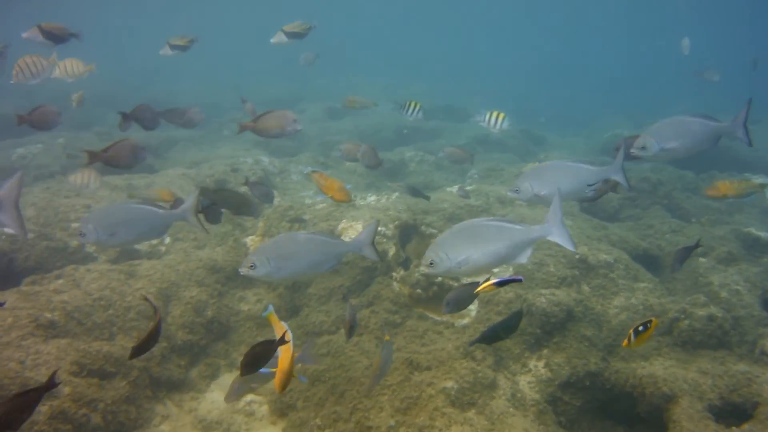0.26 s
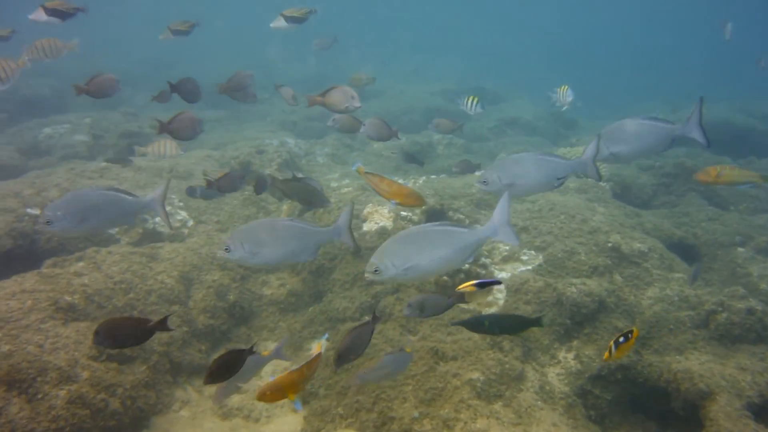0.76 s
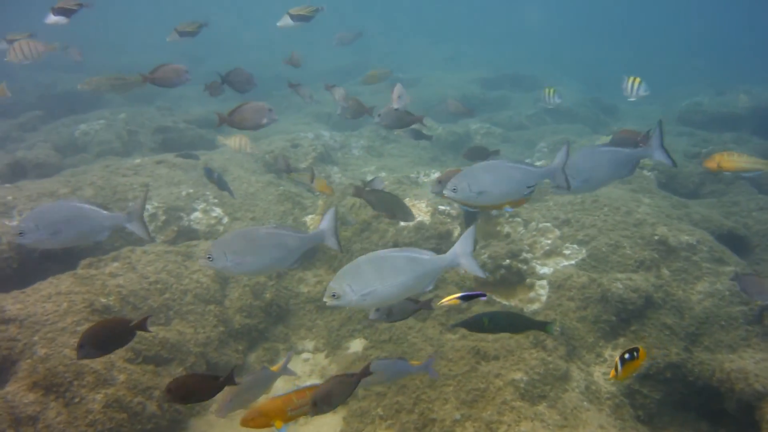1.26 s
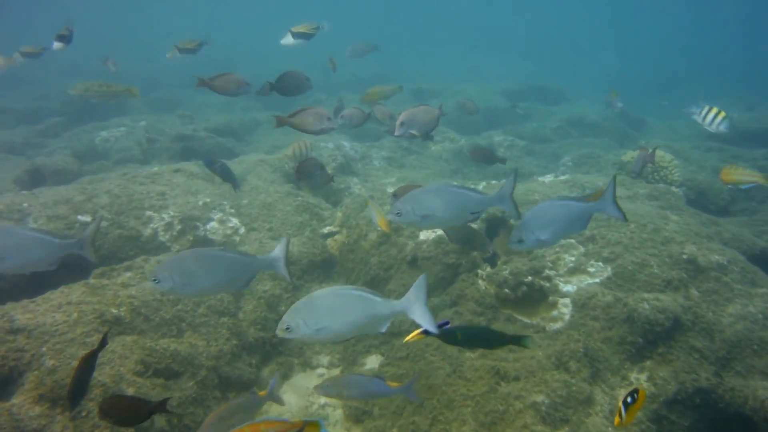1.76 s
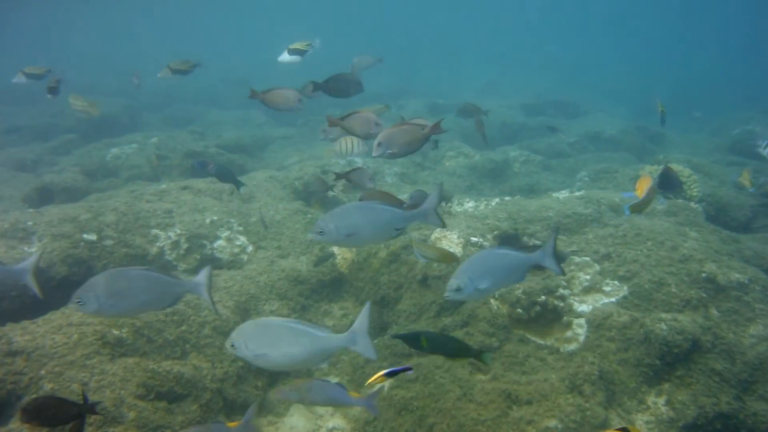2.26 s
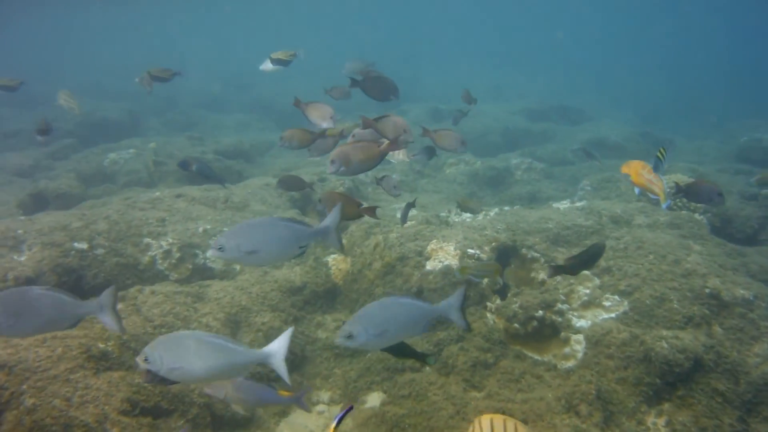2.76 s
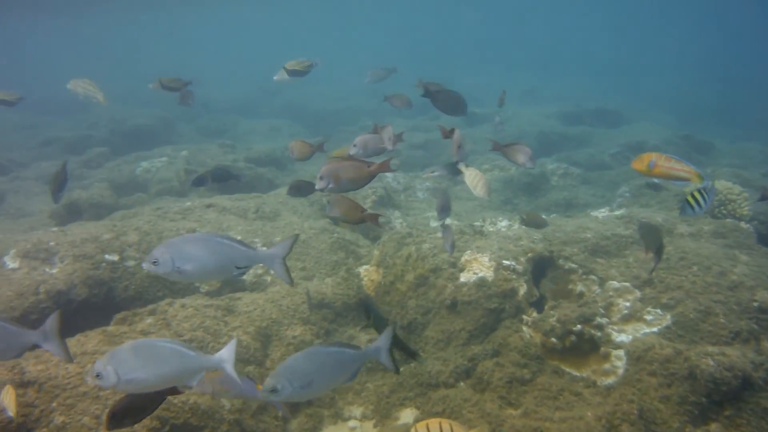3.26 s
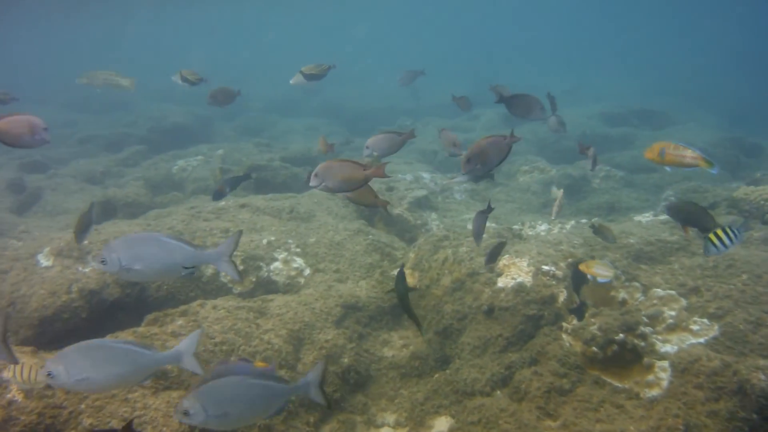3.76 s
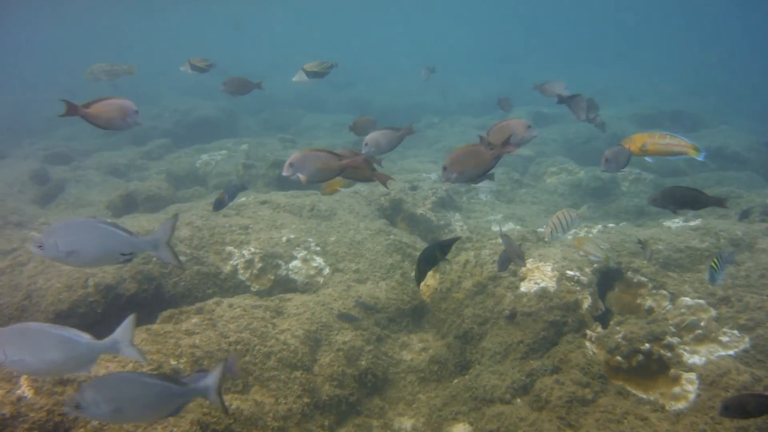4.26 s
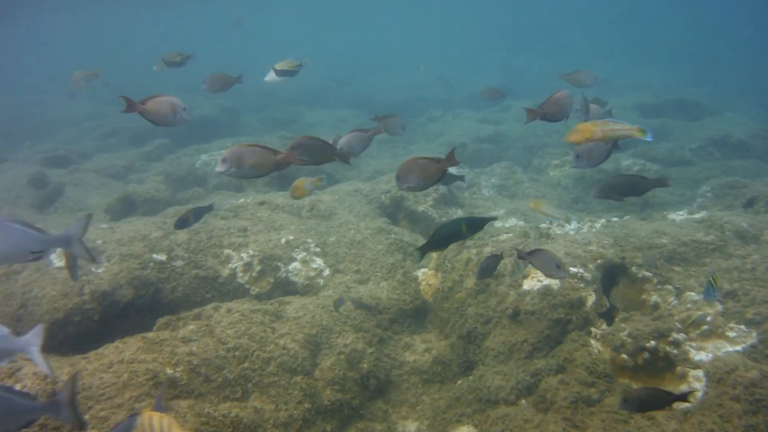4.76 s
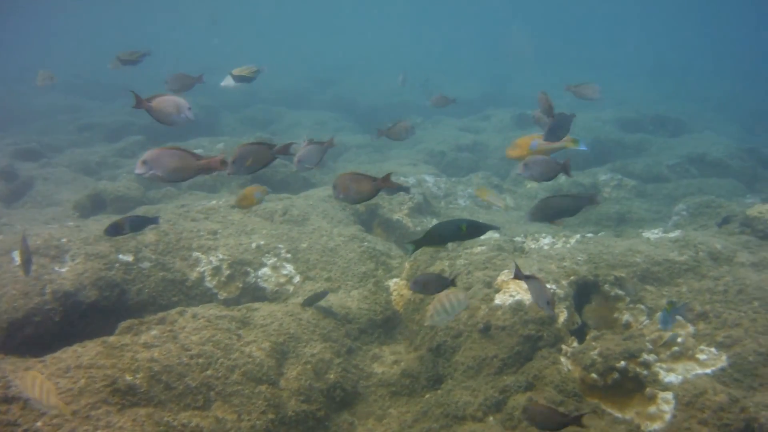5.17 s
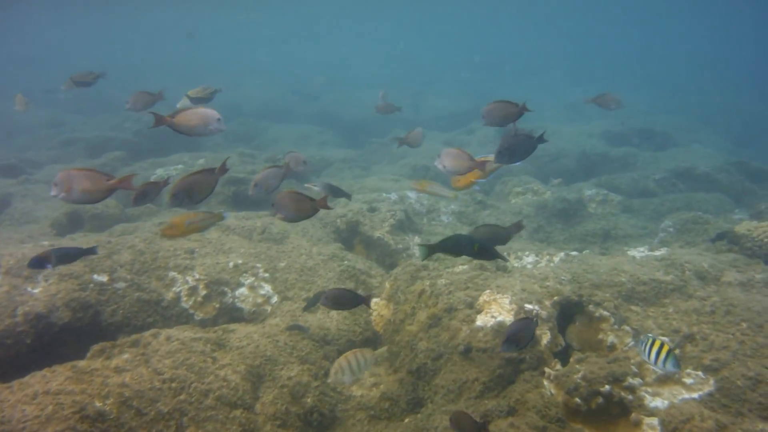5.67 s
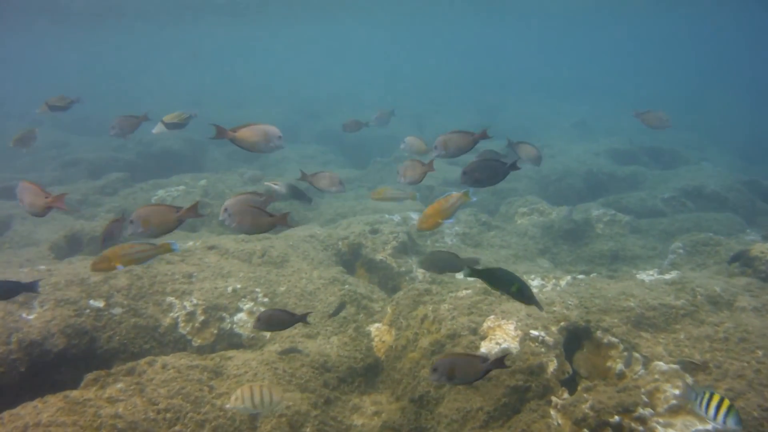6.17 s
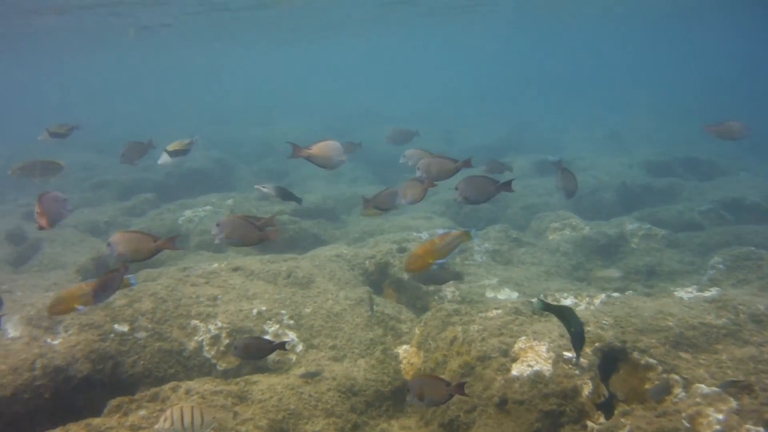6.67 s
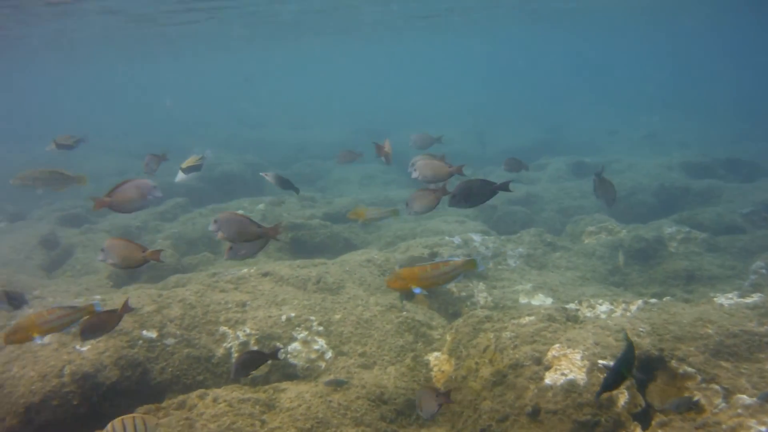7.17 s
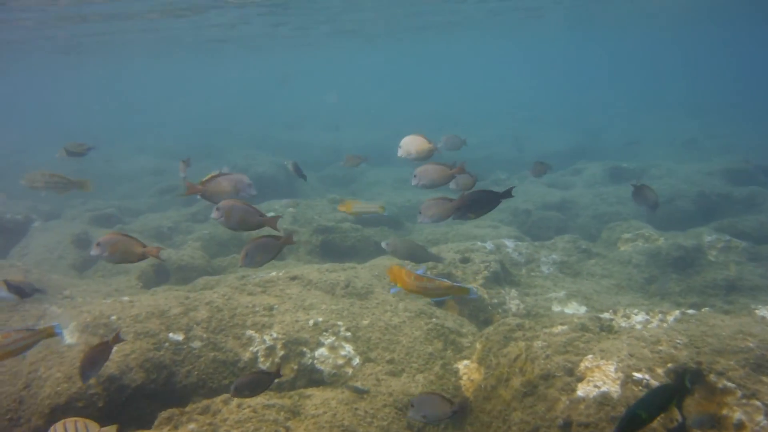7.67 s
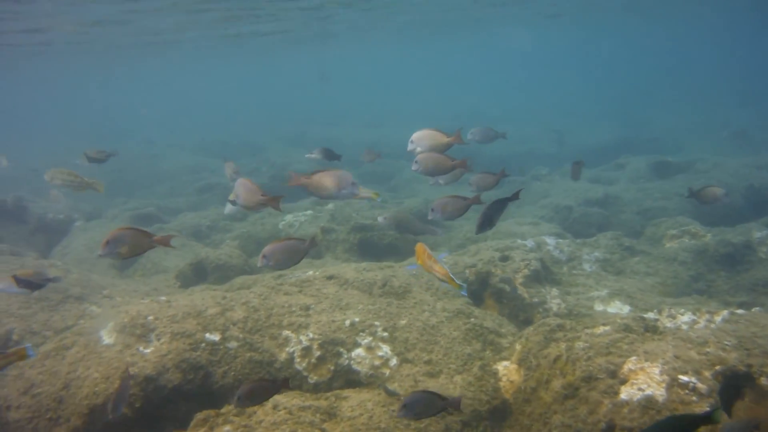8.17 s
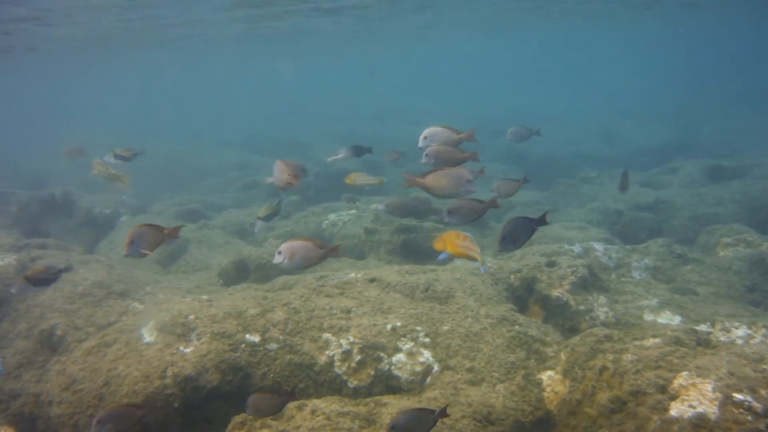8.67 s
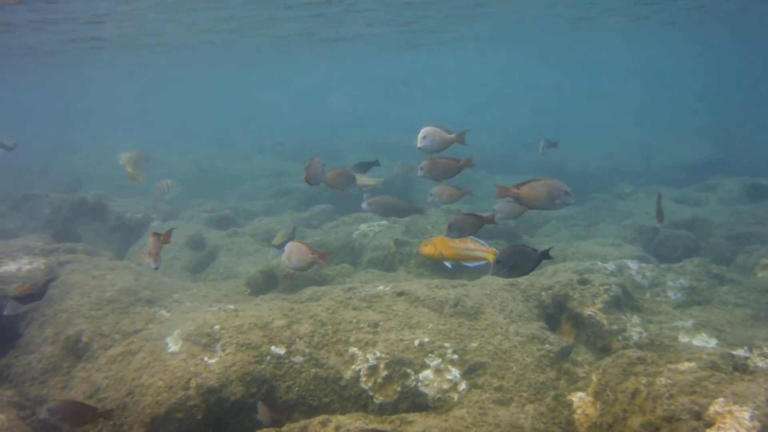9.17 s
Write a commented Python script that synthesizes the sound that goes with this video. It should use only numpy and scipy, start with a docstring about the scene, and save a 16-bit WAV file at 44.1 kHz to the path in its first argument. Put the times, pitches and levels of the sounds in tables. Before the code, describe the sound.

Hollow, muffled underwater rush surges over a reef, with constant shrimp crackle, sharp close snaps and boomy knocks on a camera housing.

```python
"""Faint, hollow rushing water and a fine crackle open the scene, inside a watertight camera housing over a reef.
The rush is turbulence coloured by the housing's air cavity; its level surges and slackens.
Knocks and eddies thud on the case: each is a pressure pulse, a dying cavity ring and a burst of crunch.
Shrimp snaps are short cracks plus wall rings, scattered over the reef or placed close by.
Gritty bursts of grains, lumps of churning water and one low hum pass over a steady murmur, hiss and thin whine."""
import sys
import numpy as np
from scipy import signal
from scipy.fft import rfft, irfft
from scipy.io import wavfile
from scipy.ndimage import uniform_filter1d

SR = 44100
rng = np.random.default_rng(int(sys.argv[2]) if len(sys.argv) > 2 else 0)


def file_out(sig):
    """Save sig as 16-bit WAV at sys.argv[1]."""
    # one column per channel
    cols = np.atleast_2d(sig).T
    # limit, then scale
    lim = np.clip(cols, -1, 1)
    pcm = np.round(lim * 32767).astype(np.int16)
    wavfile.write(sys.argv[1], SR, pcm)


N = 414981
TIME = np.arange(N) / SR


def from_db(db):
    """Decibels to gain."""
    return 10 ** (np.asarray(db) / 20)


def rms_one(x):
    """Scale to rms 1."""
    return x / np.sqrt(np.mean(x ** 2) + 1e-20)


def peak_one(x):
    """Scale to peak 1."""
    return x / (np.abs(x).max() + 1e-20)


def in_time(rows):
    """Draw a curve through (t/s, value) rows at every sample."""
    return np.interp(TIME, *np.transpose(rows))


def swell(at_s, length_s):
    """A smooth rise and fall of height 1 around a moment."""
    return np.exp(-2 * np.minimum(((TIME - at_s) / length_s) ** 2, 20))


def add(out, s, sound):
    """Mix a sound in at a time in seconds."""
    at = max(int(round(s * SR)), 0)
    out[at:at + len(sound)] += sound[:max(N - at, 0)]


def response(colour, size=4096):
    """Minimum-phase impulse response of a body with this colour, falling 10 dB per octave beyond its ends."""
    hz, db = np.transpose(colour)
    octave = np.log2(np.maximum(np.fft.rfftfreq(size, 1 / SR), 1))
    known = np.log2(hz)
    beyond = np.abs(octave - np.clip(octave, known[0], known[-1]))
    level_db = np.interp(octave, known, db) - 10 * beyond
    # folding the cepstrum forward makes the response causal
    cepstrum = irfft(np.log(from_db(level_db)))
    cepstrum[1:size // 2] *= 2
    cepstrum[size // 2 + 1:] = 0
    return irfft(np.exp(rfft(cepstrum)))[:size // 2]


def noise(colour, size=N):
    """Noise of a given colour, rms 1."""
    body = response(colour)
    white = rng.standard_normal(size + len(body) - 1)
    return rms_one(signal.fftconvolve(white, body, "valid"))


def scatter(share, decay_s, size=600):
    """One click with the quick, dying reflections from rock and case."""
    path = share * rng.standard_normal(size) * np.exp(-np.arange(size) / SR / decay_s)
    path[0] += 1
    return path


def resonate(x, hz, width_hz):
    """A two-pole resonance with gain 1 on top."""
    r = np.exp(-np.pi * width_hz / SR)
    feedback = [1, -2 * r * np.cos(2 * np.pi * hz / SR), r * r]
    return signal.lfilter(np.array([1, 0, -1]) * (1 - r * r) / 2, feedback, x)


# surges of the rushing water: t/s, level/dB
RUSH_LEVEL = [(0.0, -37.9), (1.02, -33), (3.08, -37.5), (3.65, -43.5), (4.14, -24.5), (4.55, -22.5),
              (4.92, -25), (5.08, -18.5), (6.23, -18), (6.33, -24.0), (6.64, -17.5), (7.5, -15.5),
              (7.74, -27.0), (8.16, -20.0), (8.65, -23.5), (8.68, -35.5), (8.98, -23.5), (9.4, -23.5)]
# colour of the housing's air cavity, driven by the flow: f/Hz, relative level/dB
CAVITY_COLOUR = [(110, -43.5), (190, -36.5), (240, -32), (282, -29), (315, -17.5), (352, -7.5), (388, -0.5),
                 (447, 1.5), (490, -3.5), (550, -11.5), (600, -23), (655, -26), (780, -38.5), (950, -50)]
# above a brisk flow, the hollow tone rises with the flow's strength
TONE_HZ, BRISK_FLOW_DB, TONE_HZ_PER_DB = 433, -23, 3.0


def rush(cavity_hz=436):
    """Turbulence drives the cavity; its hollow tone shifts a little with the flow."""
    # spare length, as a higher tone reads the noise faster
    flow = noise(CAVITY_COLOUR, size=N + N // 4)
    flow_db = in_time(RUSH_LEVEL)
    # level out the slow drift: the surge sets the swell, the turbulence only the fast flutter
    flow = flow / np.sqrt(uniform_filter1d(flow ** 2, size=5000) + 1e-9)
    tone_hz = TONE_HZ + TONE_HZ_PER_DB * np.maximum(flow_db - BRISK_FLOW_DB, 0)
    position = np.cumsum(tone_hz / cavity_hz)
    return from_db(flow_db) * np.interp(position, np.arange(len(flow)), flow)


# the stiff housing wall, which passes the snaps: f/Hz, relative level/dB
WALL_COLOUR = [(500, -68), (950, -15.5), (1100, 3), (1330, -0.5), (1550, -19), (1830, 2.5), (2020, -1.5),
               (2360, 7), (2620, 2.5), (3400, -2.5), (3920, -4), (4230, -4), (4800, -23.5), (7000, -40)]
# the thin crack of a snap: f/Hz, relative level/dB
CRACK_COLOUR = [(3500, -23.5), (4700, -5), (5400, -13), (6300, -3), (7200, -3), (8600, -11), (10500, -12),
                (13000, -20), (16000, -21)]


def colony(per_s=130, farthest=9, ring_db=-21.5, crack_db=-34, crack_spread_db=8.0, directions=20):
    """Shrimp spread over the reef snap at random; loudness falls as 1 / distance, echoes vary by direction."""
    out = np.zeros(N)
    wall, crack = response(WALL_COLOUR, size=1024), response(CRACK_COLOUR, size=1024)
    at = np.flatnonzero(rng.random(N) < per_s / SR)
    place = rng.random(N)[at]
    direction = rng.integers(0, directions, N)[at]
    aim = rng.standard_normal(N)[at]
    loudness = 1 / np.sqrt(1 + place * farthest ** 2)
    ring_gain = loudness * from_db(ring_db)
    # a claw's aim makes its crack brighter or duller
    crack_gain = loudness * from_db(crack_db + crack_spread_db * np.clip(aim, -2, 2))
    for k in range(directions):
        here = direction == k
        ring = np.convolve(wall, scatter(share=0.4, decay_s=0.0018))
        snap = np.convolve(crack, scatter(share=0.31, decay_s=0.00095))
        for body, gain in ((ring, ring_gain), (snap, crack_gain)):
            where = at[here, None] + np.arange(len(body))
            out += np.bincount(where.ravel(), (gain[here, None] * peak_one(body)).ravel(), N)[:N]
    return out


# steady murmur of open water: f/Hz, relative level/dB
MURMUR_COLOUR = [(15, -8.5), (40, 5), (90, 0.5), (220, -0.5), (330, -1.5), (500, -38), (585, -19), (650, 6),
                 (710, 0.5), (790, 3), (950, -10), (1100, -10.5), (1500, -13), (3000, -18.5)]


def open_water(murmur_db=-45, far_crackle_db=-48.0):
    """Steady noise for distant water and for far shrimp, whose snaps merge behind the wall."""
    return from_db(murmur_db) * noise(MURMUR_COLOUR) + from_db(far_crackle_db) * noise(WALL_COLOUR)


# the case's crunch: a band, its level at a 0 dB ring, and its rise in dB per dB of ring
CRUNCH_LOW_HZ, CRUNCH_HIGH_HZ, CRUNCH_DB, CRUNCH_FOLLOWS = 1230, 2200, -17, 1.7


def bumps(pushes, ring_s=0.0033, lead_s=0.00096, crunch_s=0.00076, leak_share=0.7):
    """Each bump is a push and pull of pressure; the cavity swells and dies within a few cycles."""
    out, t = np.zeros(N), np.arange(SR // 10) / SR
    before = t[len(t) // 4]
    # the ring starts slightly ahead of the push's midpoint
    since = np.maximum(t - before + lead_s, 0)
    middle = signal.butter(3, [CRUNCH_LOW_HZ, CRUNCH_HIGH_HZ], "band", fs=SR, output="sos")
    for s, thud_db, thud_hz, ring_db, ring_hz in pushes:
        u = np.sqrt(2) * np.pi * thud_hz * (t - before)
        push = -2 * u * np.exp(-u * u)
        # the slowest part of the push leaks away
        thud = signal.lfilter(*signal.butter(1, leak_share * thud_hz, "high", fs=SR), push)
        ring = peak_one(since * np.exp(-since / ring_s) * np.cos(2 * np.pi * ring_hz * since))
        # the wall crunches briefly as it flexes, the more the harder it rings
        friction = rng.standard_normal(len(t)) * (t > before) * np.exp(-since / crunch_s)
        crunch = peak_one(signal.sosfilt(middle, friction))
        crunch_gain = from_db(CRUNCH_DB + CRUNCH_FOLLOWS * ring_db)
        add(out, s - before, from_db(thud_db) * thud + from_db(ring_db) * ring + crunch_gain * crunch)
    return out


# knocks on the case: t/s, relative thud level/dB, ring peak level/dB, ring f/Hz
CASE_KNOCKS = [(0.097, -22, -13, 369), (0.751, -20.5, -19.5, 416), (1.239, -26, -21.5, 420),
               (2.722, -38, -11.5, 433), (2.784, -47, -17.5, 453), (2.867, -17.5, -21.5, 374),
               (4.554, -3, 3.5, 377.5), (5.073, -2, 1.5, 367), (5.288, -8, -9.5, 358),
               (5.490, -2, -1.5, 368), (5.712, -7.5, -13, 357), (7.368, -4.5, 0, 376),
               (7.582, -10, -16, 366), (8.621, -32, -12.5, 420)]
KNOCK_THUD_HZ = 196


def knocks():
    """Quick, hard pushes on the case that set the cavity ringing."""
    return bumps([(s, thud_db, KNOCK_THUD_HZ, ring_db, ring_hz)
                  for s, thud_db, ring_db, ring_hz in CASE_KNOCKS])


# close shrimp snaps: t/s, relative level/dB, ring f/Hz, crack level relative to the snap/dB
CLOSE_SNAPS = [(0.1438, -32.5, 2330, -4.5), (0.2316, -19.5, 2360, -35), (0.3666, -21.5, 2800, -20),
               (0.4, -16, 2810, -36), (0.413, -20, 2310, -25), (0.4341, -12, 2100, -40),
               (0.9155, -19.5, 2820, -24), (0.961, -16.5, 2500, -36), (1.048, -25.5, 2980, -5),
               (1.633, -17.5, 2510, -45), (1.794, -13.5, 2240, -22), (1.82, -19, 2370, -45),
               (2.2887, -27, 2260, -9), (2.3233, -18.5, 2850, -13), (2.3376, -17.5, 2770, -30),
               (2.379, -12, 2380, -86), (2.585, -26, 2820, -12), (2.9277, -25.5, 2380, -17),
               (2.9888, -20, 2900, -28), (3.1381, -17, 2470, -21), (3.257, -21, 2800, -11.5),
               (3.352, -27.5, 2480, -1.5), (3.5154, -19.5, 2600, -27), (3.9573, -25.5, 2430, -8),
               (4.0589, -7, 2360, -21), (4.2198, -23, 2200, -14), (4.3069, -12, 2400, -20),
               (4.7506, -23.5, 2720, -21), (4.9906, -18.5, 2600, -34), (5.0731, -15.5, 2530, -30),
               (5.129, -23, 2380, -32), (5.4, -27.5, 2320, -9), (5.7659, -17, 2800, -11),
               (5.799, -10, 2430, -31), (5.9277, -16, 2780, -13), (6.129, -23, 2380, -22),
               (6.443, -20, 2290, -12.5), (6.648, -10.5, 2340, -46), (6.7058, -11, 2330, -12.5),
               (7.0342, -13.5, 2340, -43), (7.5007, -24, 2430, -11), (7.71, -15.5, 2630, -18),
               (7.8376, -24, 2710, -13), (7.9352, -10, 2270, -22), (8.0613, -19.5, 2290, -28),
               (8.379, -24, 2410, -26), (8.4284, -24.5, 2480, -15), (8.7228, -22.5, 2470, -18),
               (9.1274, -20, 2400, -48)]
# the wall's main ring under a close snap: f/Hz, relative level/dB
MAIN_RING_COLOUR = [(600, -41), (950, -28), (1100, -12), (1330, -15), (1550, -24.5), (1830, -22.5),
                    (2020, -20.5), (2300, -4), (2850, -7.5), (3300, -17.5), (4200, -53.5)]
# the wall's upper rings: f/Hz, relative level/dB
UPPER_RING_COLOUR = [(2000, -17), (2700, 13), (3300, 14.5), (3650, 14.5), (3950, 4.5), (4230, 11.5),
                     (4500, 0.5), (5000, -8)]


def close_shrimp(ring_db=0.5, upper_follows=0.11, crack_db=7.0, mode_db=1.5, mode_width_hz=300,
                 crack_hz=7600, crack_octaves=0.36, crack_width_share=0.6, crack_focus_db=5, echo_s=0.0018):
    """A claw's collapsing bubble cracks and rings the wall at a pitch that depends on where it hits."""
    out = np.zeros(N)
    main, upper, crack = response(MAIN_RING_COLOUR), response(UPPER_RING_COLOUR), response(CRACK_COLOUR)
    for s, snap_db, hz, sharp_db in CLOSE_SNAPS:
        ring = np.convolve(main, scatter(share=0.52, decay_s=echo_s))
        ring = ring + from_db(mode_db) * resonate(ring, hz, mode_width_hz)
        add(out, s, from_db(snap_db + ring_db) * peak_one(ring))
        # the sharper the crack, the more it stirs the upper rings
        high = np.convolve(upper, scatter(share=0.93, decay_s=echo_s))
        add(out, s, from_db(snap_db + upper_follows * sharp_db) * peak_one(high))
        # the crack gathers around a random pitch, as bubbles vary in size
        collapse = np.convolve(crack, scatter(share=0.33, decay_s=0.0007))
        centre = crack_hz * 2 ** rng.uniform(-crack_octaves, crack_octaves)
        width = crack_width_share * centre
        focus = resonate(resonate(collapse, centre, width), centre, width)
        sharp = peak_one(collapse) + from_db(crack_focus_db) * peak_one(focus)
        add(out, s, from_db(snap_db + sharp_db + crack_db) * peak_one(sharp))
    return out


# short gritty scrapes; the two near 2.7 s are the upper body of knocks on the case:
# t/s, relative level/dB, body f/Hz
GRITTY_BURSTS = [(0.182, -36, 1180), (0.935, -33.5, 1070), (1.044, -34.5, 1080), (1.392, -35.5, 1240),
                 (2.586, -34, 1130), (2.725, -35.5, 760), (2.787, -31.5, 800), (3.258, -37, 1140),
                 (4.25, -29.5, 1070), (5.131, -37, 1200), (6.073, -25.5, 1130), (7.435, -33.5, 1170)]
BURST_S = 0.0082


def gritty_bursts(width_hz=400, grit_db=-6, grains_per_s=700):
    """A quick run of random grains sounds the wall's low mode, with a little grit above."""
    out, t, wall = np.zeros(N), np.arange(SR // 5) / SR - 1 / 10, response(WALL_COLOUR)
    stroke = np.exp(-2 * (t / BURST_S) ** 2)
    for s, db, hz in GRITTY_BURSTS:
        grains = rng.standard_normal(len(t)) * (rng.random(len(t)) < grains_per_s / SR) * stroke
        body = resonate(resonate(grains, hz, width_hz), hz, width_hz)
        grit = signal.fftconvolve(grains, wall)[:len(t)]
        burst = rms_one(body) + from_db(grit_db) * rms_one(grit)
        add(out, s + t[0], from_db(db) * stroke.std() * burst)
    return out


# eddies that slap the case, mostly in short runs: t/s, relative level/dB, thud f/Hz
EDDY_SLAPS = [(0.274, -26.5, 133), (0.303, -27, 80.7), (0.355, -28, 77), (0.772, -24, 109),
              (0.885, -31, 140), (0.986, -31, 97.5), (1.41, -28, 75.4), (1.472, -27, 79),
              (1.507, -27.5, 94.2), (1.553, -29.5, 83.4), (2.88, -32, 96), (3.112, -33, 75.4),
              (3.187, -31, 75.4), (3.239, -30, 75.4), (3.268, -22, 87), (3.356, -24, 88.8),
              (3.59, -30.5, 135), (4.9, -25, 88.8), (4.957, -23.5, 94.2), (4.981, -20, 140),
              (6.254, -30, 78.1), (8.445, -21, 75.4), (9.205, -34, 108)]
# thud and weak cavity ring, in dB relative to the slap's level
EDDY_THUD_DB, EDDY_RING_HZ, EDDY_RING_DB = 5, 420, -5


def eddies():
    """Soft, low slaps of water: slower pushes than a knock, ringing the cavity only weakly."""
    return bumps([(s, db + EDDY_THUD_DB, hz, db + EDDY_RING_DB, EDDY_RING_HZ) for s, db, hz in EDDY_SLAPS])


# churning water: f/Hz, relative level/dB
CHURN_COLOUR = [(25, -15), (50, 9.5), (100, 2.5), (200, -8), (330, 3.5), (600, -10.5)]
# length of a lump, and its level relative to its eddy
CHURN_S, CHURN_DB = 0.039, -11.5


def churning():
    """Brief lumps of low turbulence around the eddies."""
    lumps = sum(from_db(db + CHURN_DB) * swell(s, CHURN_S) for s, db, _ in EDDY_SLAPS)
    return lumps * noise(CHURN_COLOUR)


HUM_AT_S, HUM_S, HUM_DB = 7.27, 0.23, -41.5
HUM_PITCH_HZ, HUM_WAVER_HZ, HUM_WAVER_SHARE = 200, 16, .45


def low_hum():
    """A faint sine hum swells once and fades, its level wavering at random."""
    flutter = rms_one(resonate(rng.standard_normal(N), HUM_WAVER_HZ, HUM_WAVER_HZ))
    waver = 1 + HUM_WAVER_SHARE * flutter
    tone = np.sqrt(2) * np.sin(2 * np.pi * HUM_PITCH_HZ * TIME)
    return from_db(HUM_DB) * swell(HUM_AT_S, HUM_S) * waver * tone


def scene():
    """Everything that reaches the microphone inside the housing."""
    water = rush() + open_water() + churning() + low_hum()
    case = knocks() + eddies() + gritty_bursts()
    shrimp = colony() + close_shrimp()
    return (water + case + shrimp)[None]


# the microphone's own hiss: f/Hz, relative level/dB
HISS_COLOUR = [(1000, 9), (5000, 1), (7000, 5), (8600, 4.5), (10000, 0.5), (13000, 0.5), (16000, -1.5)]
WHINE_HZ, WHINE_DB, NOTCH_HZ, CUTOFF_HZ = 15734, -76, 7810, 15800


def record(dry, hiss_db=-54.5, notch_width_hz=300):
    """The camera adds hiss and a thin whine, notches the treble, clips at full scale and cuts the top."""
    whine = np.sqrt(2) * np.sin(2 * np.pi * WHINE_HZ * TIME)
    x = dry + from_db(hiss_db) * noise(HISS_COLOUR) + from_db(WHINE_DB) * whine
    x = signal.lfilter(*signal.iirnotch(NOTCH_HZ, NOTCH_HZ / notch_width_hz, fs=SR), x)
    lowpass = signal.ellip(12, .1, 80, CUTOFF_HZ, fs=SR, output="sos")
    return signal.sosfilt(lowpass, np.clip(x, -1, 1))


dry = scene()
out = record(dry)
file_out(out)
```